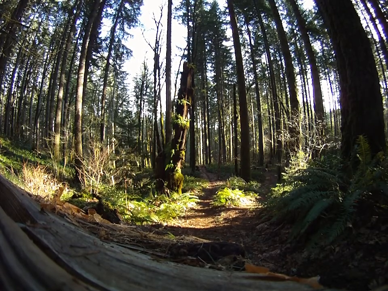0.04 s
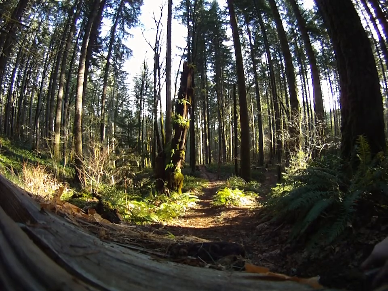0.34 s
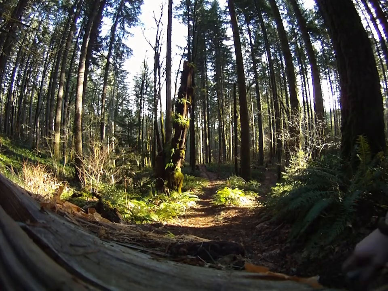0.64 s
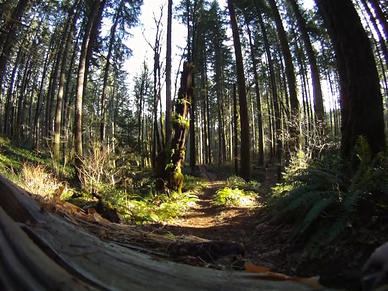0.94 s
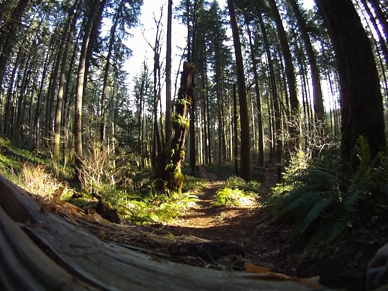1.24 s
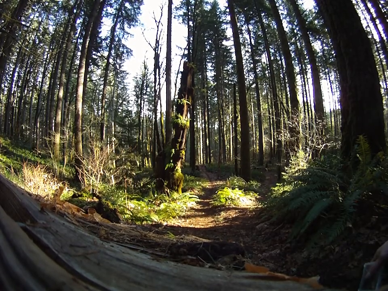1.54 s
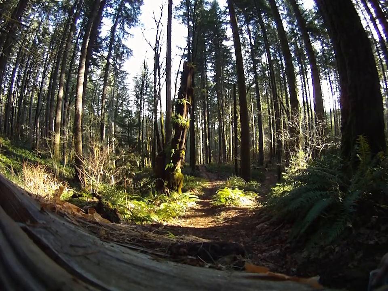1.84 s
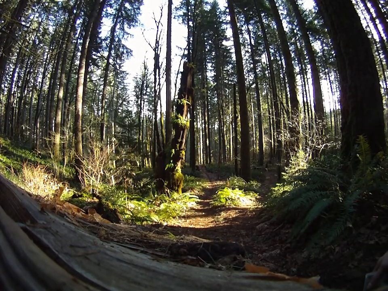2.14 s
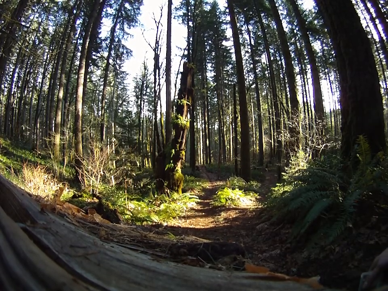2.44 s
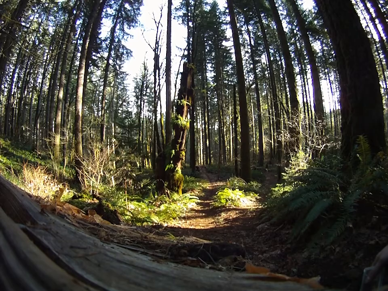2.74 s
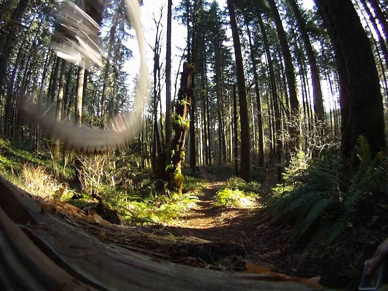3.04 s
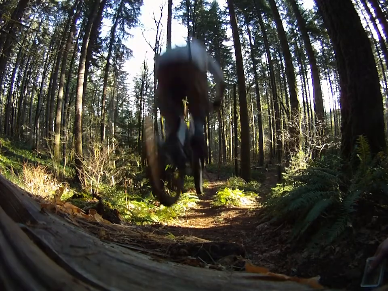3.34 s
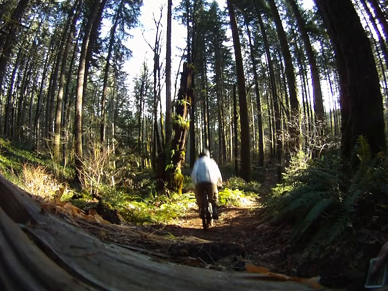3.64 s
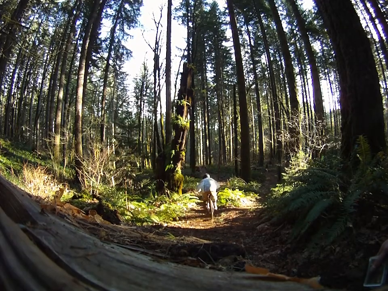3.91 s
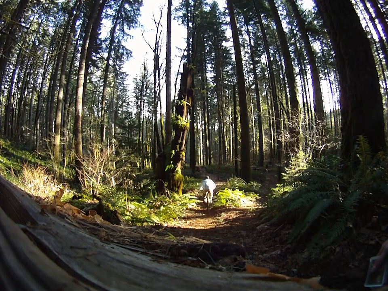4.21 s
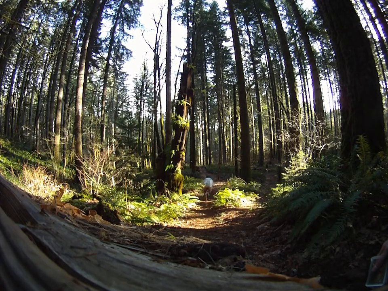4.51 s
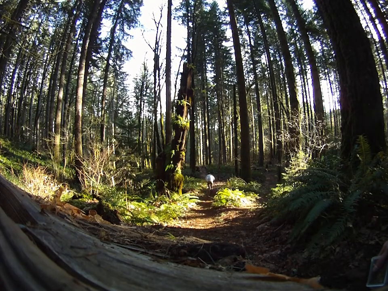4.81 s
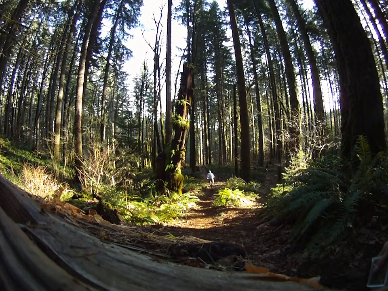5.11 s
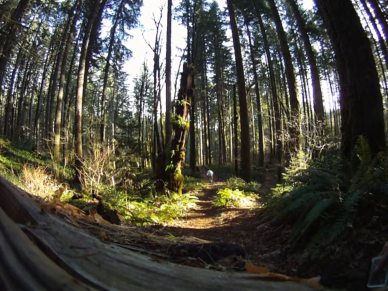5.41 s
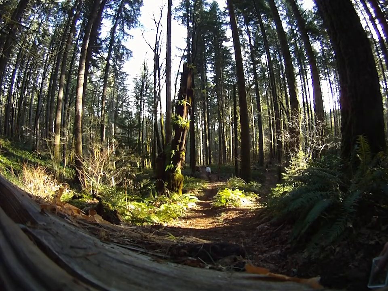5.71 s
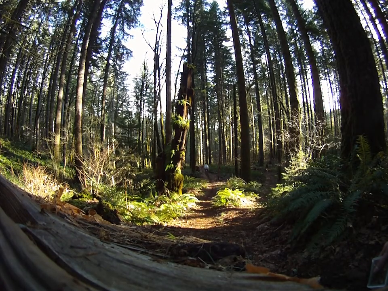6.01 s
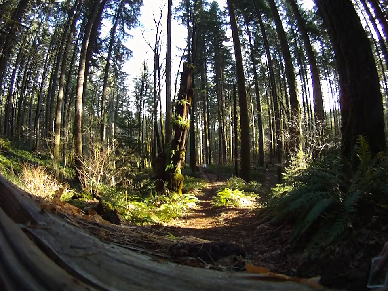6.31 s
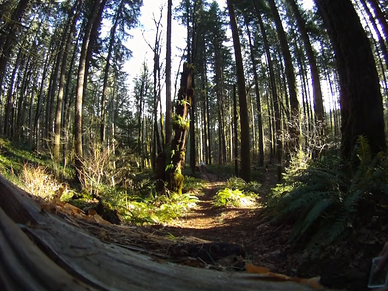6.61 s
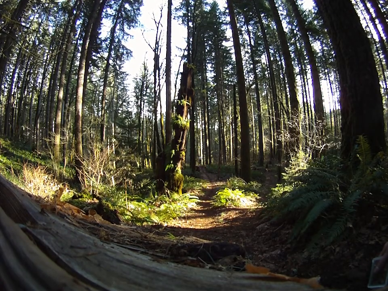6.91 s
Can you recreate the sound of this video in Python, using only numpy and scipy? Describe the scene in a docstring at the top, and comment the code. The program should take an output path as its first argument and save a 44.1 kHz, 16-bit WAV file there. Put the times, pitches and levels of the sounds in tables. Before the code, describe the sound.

In faint forest air, twigs snap under an approaching mountain bike. Its tyres drum up a wooden ramp, the planks clattering louder until the last board bangs right by the microphone. The chain jangles and the freehub ticks briefly in midair. Both wheels thud into dirt, and the bike crunches away with chain slaps while its wake buffets the microphone.

```python
"""A forest trail with a wooden drop, a small camera just under the lip. A mountain bike snaps over twigs
and stones, drums up the ramp, cracks across the last planks and slaps the end board against its support.
The chain jangles and the freehub ticks through the air, both wheels thud and spray into the dirt, and the
bike crunches away, chain rattling, while its wake buffets the microphone. Under it all sit a faint bed
of forest air and the echo of the trunks."""
import sys
import numpy as np
from scipy import signal
from scipy.fft import rfft, irfft
from scipy.io import wavfile
from scipy.ndimage import uniform_filter1d

SR = 44100
rng = np.random.default_rng(int(sys.argv[2]) if len(sys.argv) > 2 else 0)


def output_pcm(signal):
    """Save a mono or channel-first signal as 16-bit PCM at the path in sys.argv[1].

    Samples are clipped to [-1, 1] before scaling.
    """
    pcm = np.clip(np.atleast_2d(signal).T, -1, 1) * 32767
    wavfile.write(sys.argv[1], SR, np.round(pcm).astype(np.int16))


N = 311346
T = np.arange(N) / SR
SPEED_M_S, TYRE_NEAR_M = 7.23, 0.6  # riding speed; closest the tyres come to the microphone
EARSHOT_S, MOUNT_S, HUB_PASS_S, TOUCHDOWN_S = 1.905, 2.35, 3.24, 3.645

# Cue lists. Levels are trims ahead of the mix; a decay is the time to fall 60 dB.
# twigs and stones snapping: start_s, body_db, tick_db, crumble_ratio
SNAPS = [(0.2555, -47.5, -37, 0.4), (0.5942, -42, -46, 0), (0.7566, -31, -38, .07),
         (0.8914, -42.5, -36, .2), (0.9008, -37.5, -36, .1), (1.3428, -50, -45, .3),
         (1.4913, -43.5, -38.5, 0.06), (1.767, -30.5, -33, .05), (1.8385, -30.5, -35, .07),
         (1.899, -45, -52, 0.2), (1.9624, -31, -35, 0.17), (2.0194, -34, -37, 0.08), (2.1236, -34, -40, .7),
         (2.129, -30, -34, .6), (2.1335, -31, -38, .6), (2.1985, -29.5, -34, .6), (2.225, -29.5, -31, 0.8)]
# front wheel and almost unloaded rear wheel leaving the ramp: lip_s, rumble_db, grit_db
WHEELS = [(3.031, -22, -33.5), (3.17, -39.5, -42)]
# chain and frame jangles, plus one sharp stone tick at 2.15 s: start_s, level_db, decay_s
JANGLES_AND_TICK = [(2.044, -38, 0.049), (2.1545, -29, 0.0026), (3.062, -13.5, 0.09), (3.089, -21, 0.13),
                    (3.13, -26, 0.063), (3.149, -18.5, 0.052), (3.242, -29, 0.11), (3.688, -19.5, 0.04),
                    (3.737, -20.5, 0.041)]
# hard tyre hits on the planks: start_s, level_db
PLANK_HITS = [(2.3302, -24.5), (2.4018, -24), (2.461, -23.5), (2.4742, -22), (2.508, -25.5),
              (2.5432, -21.5), (2.6714, -22), (2.677, -20.5), (2.7301, -17), (2.7559, -18.5), (2.7912, -13),
              (2.8202, -20.5), (2.8452, -12.5), (2.865, -16), (2.9005, -12), (2.9087, -13), (2.9396, -6.5),
              (2.9465, -10), (2.9564, -6), (2.9641, -2.5), (2.9715, -7.5), (2.9871, -4.5), (3.0094, -4),
              (3.0165, -4.5), (3.0265, 1.5), (3.163, -14.5)]
# volleys of tread knobs scraping over an edge: start_s, level_db, length_s
SCRAPES = [(2.672, -22.5, 0.0091), (3.01, -12, 0.0059), (3.021, -5, 0.0097), (3.159, -20.5, 0.014)]
# end board slapping its support: start_s, level_db, contact_s
BOARD_SLAPS = [(3.0117, -16, 0.00079), (3.0243, -25, 0.00047), (3.0639, 1.5, 0.00059), (3.07, -11, 0.00086)]
# wake gusts on the microphone: start_s, length_s, level_db
GUSTS = [(3.291, 0.023, -26), (3.656, 0.3, -39), (3.998, .15, -26.5), (4.195, .04, -28), (4.319, .23, -32),
         (4.649, 0.29, -35.5), (4.996, 0.444, -33.5), (5.474, .04, -37), (5.579, 0.043, -38),
         (5.672, .02, -44.5), (5.965, 0.077, -47.5), (6.14, 0.11, -47), (6.95, 0.074, -51.5)]
# single eddies on the microphone: start_s, level_db, first_pitch_hz, length_s
EDDIES = [(3.277, -17.5, 790, 0.019), (3.296, -26, 630, 0.023), (4.003, -25, 218, 0.03),
          (4.095, -20, 446, 0.021), (4.121, -19.5, 190, 0.042), (4.19, -22.5, 216, 0.033),
          (5.151, -29, 240, 0.035), (5.298, -30, 240, .032), (5.404, -26.5, 250, 0.034)]
# wheels hitting the dirt: start_s, spray_db, spray_decay_s, thud_db
LANDING_HITS = [(3.642, -18, 0.08, -21.5), (3.67, -22, 0.036, -46), (3.688, -16.5, 0.051, -28),
                (3.692, -16, 0.032, -38), (3.711, -20.5, 0.055, -26), (3.738, -22, 0.08, -32)]
# fader moves for the tyres on the trail: time_s, needle_crunch_db, soil_scuff_db
TRAIL_LEVELS = [(3.72, -40.5, -45), (3.74, -37, -37), (3.81, -46, -45.5), (4.23, -56, -55),
                (4.48, -50, -45.5), (4.78, -51, -56), (5.4, -56, -58.5), (6.27, -68.5, -71),
                (6.82, -83, -68)]
# hollow ground drumming under the tyres: start_s, length_s, level_db
HOLLOWS = [(3.73, 0.058, -36.5), (5.079, 0.35, -47.5), (6.612, 0.32, -61.5)]
# hard chain slaps down the trail: start_s, level_db
CHAIN_SLAPS = [(3.867, -23), (4.09, -29), (4.123, -28), (4.315, -30), (4.3708, -24.5), (4.4277, -25),
               (4.4916, -30.5), (4.647, -23), (4.808, -25.5), (4.864, -25.5), (4.9167, -26.5), (5.252, -33),
               (5.3558, -24), (5.4458, -29.5), (6.468, -42), (6.912, -37.5)]

# Resonances: pitch_hz, level_db, decay_s
STEEL_MODES = [(2750, -11, .04), (3470, 0.5, .08), (3754, 1, 0.047), (4010, -3.5, .07),
               (4490, 12.5, 0.0059), (4834, 0.5, 0.048), (5220, 1, 0.042), (6780, -7, 0.045),
               (6740, -37, 0.034), (7010, -8, 0.04), (7800, -5, 0.059), (8810, -5, 0.068)]  # drivetrain steel
BOARD_MODES = [(223, -21, 0.049), (273.4, 5.5, 0.14), (332, -1, 0.13), (348, 7, 0.073), (404, -7, 0.06),
               (508, -5.5, 0.16), (638, 11.5, 0.036), (848, 3, 0.07), (1070, -25, 0.043), (1300, -9, .08)]  # wooden board

# EQ curves: frequency_hz, gain_db
FOREST_EQ = [(20, -6.5), (55, 2.5), (100, -6.5), (200, -6), (330, -10), (500, -9), (1000, -13),
             (1500, -14.5), (4000, -20.5), (8000, -25.5), (10000, -29.5), (15000, -31)]  # air among the trees
SNAP_EQ = [(150, -53), (500, 2.5), (1300, 3), (2000, -3), (3000, -19), (8000, -35)]  # dull body of a snap
TICK_EQ = [(1500, -33), (4000, -2.5), (7500, -13), (10500, -4), (15000, -6)]  # its thin top
DECK_EQ = [(20, -21), (45, 0.5), (90, 2), (135, 0), (190, -12.5), (290, -9.5), (600, -17), (1500, -51.5)]  # low rumble of the ramp
GRIT_EQ = [(100, -26), (450, 0), (900, -1.5), (1600, -5.5), (2800, -13.5), (4500, -18.5), (7500, -24),
           (10000, -18.5), (15000, -25.5)]  # grit under the treads
PAWL_EQ = [(1500, -50), (3000, -0.5), (4100, -6), (4700, -7.5), (6000, 1.5), (7000, -6.5), (8000, -14),
           (9500, -16.5), (15000, -20.5)]  # bright steel click
CRACK_EQ = [(60, -2), (150, -4.5), (450, 4.5), (900, -3), (1350, -1.5), (1900, -5.5), (2800, -8.5),
            (4500, -21), (7500, -24.5), (10000, -17), (15000, -20)]  # tyre striking wood
WIND_EQ = [(15, -4.5), (35, -2), (60, 3), (100, -7), (160, -18.5), (300, -37), (800, -61)]  # bass-heavy buffeting
DIRT_EQ = [(80, 4), (200, 12.5), (500, 6), (900, 10), (1500, -3), (2400, 3.5), (4500, -7.5), (8500, -9),
           (11000, -13), (15000, -12.5)]  # landing spray
NEEDLE_EQ = [(600, -15), (1500, -8), (2000, 2.5), (2800, 1), (4200, -3.5), (5500, -5.5), (9000, -8.5),
             (10700, -15), (15000, -16.5)]  # crisp needle crunch
SOIL_EQ = [(100, -7), (300, -6.5), (500, 0.5), (850, 0), (1250, -4), (1700, -16), (3000, -30)]  # dull soil scuff
GROUND_EQ = [(80, -17), (200, 8), (340, 1), (450, -4.5), (800, -30)]  # drumming ground
CLATTER_EQ = [(300, -1), (1500, -1), (2800, 3), (5000, -2), (8500, -5.5), (11000, -15), (15000, -8)]  # chain links


def undb(db):
    """Decibels to gain."""
    return 10 ** (np.asarray(db) / 20)


def unit(x):
    """Scale to rms 1."""
    return x / np.sqrt(np.mean(x ** 2))


def peak(x):
    """Scale to peak 1."""
    return x / np.abs(x).max()


def even(x):
    """Hold the short-term rms at 1."""
    return x / np.sqrt(uniform_filter1d(x ** 2, size=3000))


def fade(decay_s, size=8192):
    """Exponential tail, 60 dB down after decay_s."""
    return np.exp(-np.log(1000) * T[:size] / decay_s)


def burst(decay_s, size=8192):
    """Dying noise."""
    return rng.standard_normal(size) * fade(decay_s, size)


def eq(x, curve, size=4096):
    """Minimum-phase EQ: nothing rings ahead of a transient."""
    hz, db = np.transpose(curve)
    gain = undb(np.interp(np.log(np.fft.rfftfreq(size, 1 / SR) + 1), np.log(hz), db))
    cepstrum = irfft(np.log(gain))[:size // 2]
    cepstrum[1:] *= 2
    return signal.fftconvolve(x, irfft(np.exp(rfft(cepstrum, size))))[:len(x)]


def vary(curve, spread_db):
    """Random ripple on an EQ curve: every spot of the wood has its own colour."""
    hz, db = np.transpose(curve)
    bands_hz = np.geomspace(hz[0], hz[-1], num=28)
    ripple_db = spread_db * rng.standard_normal(len(bands_hz))
    return np.column_stack([bands_hz, np.interp(np.log(bands_hz), np.log(hz), db) + ripple_db])


def ring(modes, longest_s=np.inf):
    """Struck resonances, their decays capped at longest_s."""
    return sum(undb(db) * np.sin(2 * np.pi * hz * T[:8192]) * fade(min(decay_s, longest_s))
               for hz, db, decay_s in modes)


def drift(rate_hz):
    """Smooth random modulation with a spread near 1."""
    hold = int(SR / rate_hz)
    steps = np.repeat(rng.standard_normal(N // hold + 1), hold)
    return 1.3 * uniform_filter1d(uniform_filter1d(steps, hold), hold)[:N]


def grains(per_s, spread_db):
    """Random clicks of unequal size."""
    size = undb(spread_db * np.minimum(rng.exponential(size=N), 4))
    return (rng.random(N) < per_s / SR) * size * rng.choice([-1, 1], N)


def nearness(s, pass_s, near_m):
    """Pass-by gain: falls as 1 / distance, 1 at the closest point."""
    return near_m / np.hypot(SPEED_M_S * (s - pass_s), near_m)


def swell(s, hold_s, attack_s, release_db_per_s):
    """Envelope that reaches 1 at s, holds and dies away."""
    attack = np.clip(1 + (T - s) / attack_s, 0, 1) ** 2
    return attack * undb(-release_db_per_s * np.maximum(T - s - hold_s, 0))


def add(out, s, x):
    """Mix a sound in at time s."""
    i = int(s * SR)
    out[i:i + len(x)] += x[:N - i]


def forest(air_db=-56.5, echo_db=-21, decay_s=1.78):
    """A bed of faint air, and the impulse response of trunks scattering the sound."""
    air = unit(eq(rng.standard_normal(N), FOREST_EQ)) * undb(air_db + 0.5 * drift(4.93))
    bloom = 1 - fade(0.22, size=65536)
    trunks = eq(burst(decay_s, size=65536) * bloom, [(60, -6), (300, -3), (2500, -1), (5000, 3.5), (12000, -2)])
    return air, undb(echo_db) * trunks / np.linalg.norm(trunks)


def twig_snaps(tick_trim_db=-3, crumble_s=0.051):
    """Twigs and stones snap under the tyres: a dull, crumbling body with a thin tick on top."""
    out = np.zeros(N)
    for s, body_db, tick_db, crumble in SNAPS:
        push = crumble * burst(crumble_s) * fade(crumble_s)
        push[0] += 1
        add(out, s, undb(body_db) * peak(eq(push, vary(SNAP_EQ, spread_db=4.5))))
        add(out, s, undb(tick_db + tick_trim_db) * peak(eq(burst(0.012), TICK_EQ)))
    return out


def ramp_roll(loss_db_per_m=3.5, soil_db=-6, mount_fade_s=0.046, attack_s=0.52, patchy_db=3.5):
    """Tread knobs drum on the deck and grind its grit, building as each wheel nears the lip."""
    surface = undb(soil_db * np.clip((MOUNT_S - T) / mount_fade_s, 0, 1))  # softer before the ramp
    rumble_gain = grit_gain = 0
    for lip_s, rumble_db, grit_db in WHEELS:
        to_go_m = SPEED_M_S * np.maximum(lip_s - T, 0)
        drumming = swell(EARSHOT_S, lip_s - EARSHOT_S, attack_s, release_db_per_s=113)
        grinding = swell(EARSHOT_S, lip_s - EARSHOT_S, attack_s, release_db_per_s=100)
        rumble_gain += undb(rumble_db - loss_db_per_m * to_go_m) * drumming
        grit_gain += undb(grit_db) * nearness(T, lip_s, TYRE_NEAR_M) * grinding
    rumble = even(eq(grains(900, 4.3), DECK_EQ)) * rumble_gain * surface
    grit = unit(eq(grains(2200, 4.3), GRIT_EQ)) * grit_gain
    return rumble + grit * undb(patchy_db * drift(60))


def jangles_and_stone_tick(detune=0.02, clash_db=-1):
    """Chain and frame jangles, plus one sharp stone tick: bright bursts with a ring that shifts pitch."""
    out = np.zeros(N)
    for s, db, decay_s in JANGLES_AND_TICK:
        shake = burst(decay_s)
        modes = [(hz * (1 + detune * rng.standard_normal()), *rest) for hz, *rest in STEEL_MODES]
        add(out, s, undb(db) * peak(signal.fftconvolve(shake, ring(modes, longest_s=0.035))))
        add(out, s, undb(db + clash_db) * peak(eq(shake, PAWL_EQ)))
    return out


def plank_hit(ring_db=-21):
    """One tyre hit: a sharp crack, a splutter of small contacts and a short wooden boom."""
    splutter = 0.076 * burst(0.012)
    boom = 0.011 * eq(burst(0.07), [(100, 6), (500, 6), (1200, -6), (4000, -20)])
    push = splutter + boom
    push[0] += 1
    # each hit lands on another spot and wakes the resonances differently
    modes = [(hz, db + 4 * rng.standard_normal(), decay_s) for hz, db, decay_s in BOARD_MODES]
    crack = peak(eq(push, vary(CRACK_EQ, spread_db=3.5)))
    return crack + undb(ring_db) * peak(ring(modes))


def plank_clatter(hit_trim_db=1, rebound_s=0.0042, rebound_db=-10, light_per_s=14, light_db=-15):
    """Planks drop back after each hard hit; treads scrape the edges and lighter hits fall at random."""
    out = np.zeros(N)
    for s, db in PLANK_HITS:
        add(out, s, undb(db + hit_trim_db) * plank_hit())
        add(out, s + rebound_s, undb(db + rebound_db) * plank_hit())
    for s, db, length_s in SCRAPES:
        knobs = rng.standard_normal(4096) * (T[:4096] < length_s)
        add(out, s, undb(db) * peak(eq(knobs, CRACK_EQ)))
    lip_s = WHEELS[0][0]
    for slot_s in np.arange(MOUNT_S, lip_s, 1 / light_per_s):
        s = min(slot_s + rng.random() / light_per_s, lip_s)
        add(out, s, undb(light_db) * nearness(s, lip_s, TYRE_NEAR_M) * plank_hit())
    return out


def end_board(ring_db=-5):
    """The last board slaps its support and rings; a longer contact is duller."""
    out = np.zeros(N)
    slap = peak(ring([(540, -2, 0.0087), (760, 0, 0.012)]))
    body = slap + undb(ring_db) * peak(ring(BOARD_MODES, longest_s=0.13))
    for s, db, contact_s in BOARD_SLAPS:
        push = T[:512] * np.exp(-2 * np.pi * T[:512] / contact_s)
        add(out, s, undb(db) * peak(np.convolve(body, push)))
    return out


def freehub(coast_s=3.056, clicks_per_s=100, weak_db=-6, scatter_db=2, level_db=-39.5, falloff=1.86):
    """Pawls tick, strong and weak in turn, and ring the hub shell as the bike flies past."""
    clicks = np.zeros(N)
    for k, s in enumerate(np.arange(coast_s, TOUCHDOWN_S, 1 / clicks_per_s)):
        pawl = burst(0.016)
        slack_s = 0.0007 * rng.standard_normal()
        add(clicks, s + slack_s, pawl * undb(weak_db * (k % 2) + scatter_db * rng.standard_normal()))
    shell = signal.fftconvolve(clicks, ring([(4080, 0, 0.05), (7950, -4, 0.025)]))[:N]
    hub = eq(clicks, PAWL_EQ) + 0.016 * shell
    hub /= hub[(T > coast_s) & (T < TOUCHDOWN_S)].std()
    return hub * undb(level_db) * nearness(T, HUB_PASS_S, near_m=0.66) ** falloff


def wake_gusts(stirred_db=-57.5, sag_db_per_s=4.5, flutter_db=1.5, swirl_db=-8):
    """Gusts rumble on the microphone, stronger ones reaching higher; the air stays faintly stirred."""
    gust = undb(stirred_db) * np.clip(T - HUB_PASS_S, 0, 1)
    for s, length_s, db in GUSTS:
        sag_db = sag_db_per_s * np.maximum(T - s, 0)
        envelope = swell(s, length_s, attack_s=0.027, release_db_per_s=304)
        gust = np.maximum(gust, undb(db - sag_db) * envelope)
    gust *= undb(flutter_db * drift(22))
    rumble = even(eq(rng.standard_normal(N), WIND_EQ))
    swirl_eq = [(50, -18), (110, 6.5), (170, -2), (260, -6), (400, -22), (900, -52.5)]
    swirl = unit(eq(rng.standard_normal(N), swirl_eq))
    return gust * (rumble + undb(swirl_db) * swirl * (gust / gust.max()) ** 0.34)


def port_hiss(buffet, level_db=-39):
    """Turbulence hisses in the microphone port: a thin, high band riding on the buffeting."""
    hiss_eq = [(9000, -40), (11400, -16), (12000, 0), (12600, -16), (15000, -40)]
    return undb(level_db) * unit(eq(rng.standard_normal(N), hiss_eq)) * buffet


def eddies(slowed_ratio=0.4, ragged=0.27):
    """Single eddies strike the microphone: ragged blips that dive in pitch as they slow."""
    out = np.zeros(N)
    for s, db, first_hz, length_s in EDDIES:
        age = np.linspace(0, 1, int(length_s * SR))
        pitch_hz = first_hz * (slowed_ratio + (1 - slowed_ratio) * np.exp(-5 * age))
        tumble_eq = [(first_hz, 0), (2 * first_hz, -9), (8 * first_hz, -50)]
        tumble = unit(eq(rng.standard_normal(len(age)), tumble_eq))
        spin = np.sin(2 * np.pi * np.cumsum(pitch_hz) / SR) + ragged * tumble
        add(out, s, undb(db) * np.sin(np.pi * np.sqrt(age)) ** 2 * spin)
    return out


def landing():
    """The wheels spray dirt and thud into soft ground."""
    out = np.zeros(N)
    thud = peak(ring([(62.6, 9.5, 0.11), (179, 5.5, 0.062)]))
    for s, spray_db, decay_s, thud_db in LANDING_HITS:
        spray = grains(7000, 3.5)[:8192] * fade(decay_s)
        add(out, s, undb(spray_db) * peak(eq(spray, DIRT_EQ)) + undb(thud_db) * thud)
    return out


def trail_roll(scuff_trim_db=0.5, rattles_db=-10, ground_db=-4, patchy_db=2):
    """Tyres crunch away over needles, scuff the soil and drum on hollow ground, while the chain rattles lightly
    at random."""
    times_s, needles_db, soil_db = np.transpose(TRAIL_LEVELS)
    landed = T > TOUCHDOWN_S
    rolling = undb(np.interp(T, times_s, needles_db)) * landed
    scuffing = undb(np.interp(T, times_s, soil_db) + scuff_trim_db) * landed
    crunch = unit(eq(grains(2500, 3.2), NEEDLE_EQ)) * rolling
    scuff = unit(eq(grains(1500, 2.8), SOIL_EQ)) * scuffing
    rattles = unit(eq(grains(30, 1.3), CLATTER_EQ)) * rolling * undb(rattles_db)
    hollow = sum(undb(db) * swell(s, length_s, attack_s=0.061, release_db_per_s=106)
                 for s, length_s, db in HOLLOWS)
    rumble = unit(eq(grains(600, 1.7), GROUND_EQ)) * np.hypot(rolling * undb(ground_db), hollow)
    return (crunch + scuff) * undb(patchy_db * drift(45)) + rattles + rumble


def chain_slaps(decay_s=0.029):
    """At each bump the chain slaps in a tight cluster of clicks."""
    out = np.zeros(N)
    for s, db in CHAIN_SLAPS:
        links = grains(3000, 3)[:8192] * fade(decay_s)
        add(out, s, undb(db) * peak(eq(links, CLATTER_EQ)))
    return out


def port_notches(x, leak):
    """The cavity in front of the microphone cancels two treble bands; leak partly fills them."""
    notched = signal.lfilter(*signal.iirnotch(6020, Q=3.1, fs=SR), x)
    notched = signal.lfilter(*signal.iirnotch(12000, Q=7, fs=SR), notched)
    return notched + leak * (x - notched)


def scene(behind_send_db=-2):
    """Mono mix of ramp, flight and run-out; sound from ahead fills the notches more than from behind."""
    behind = twig_snaps() + ramp_roll() + plank_clatter() + end_board()
    ahead = jangles_and_stone_tick() + freehub() + landing() + trail_roll() + chain_slaps()
    air, trunks = forest()
    echo = signal.fftconvolve(undb(behind_send_db) * behind + ahead, trunks)[:N]
    buffet = wake_gusts() + eddies()
    mix = port_notches(behind + air + buffet, leak=0.13) + port_notches(ahead + echo, leak=0.19)
    return (mix + port_hiss(buffet))[None]


def record(dry, ceiling=0.8, top_hz=15350):
    """The camera soft-clips the loudest peaks and cuts the top end."""
    rounded = dry / (1 + (dry / ceiling) ** 4) ** 0.25
    return signal.sosfilt(signal.ellip(10, 0.2, 80, top_hz, fs=SR, output="sos"), rounded)


dry = scene()
out = record(dry)
output_pcm(out)
```